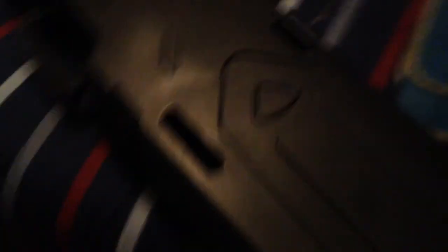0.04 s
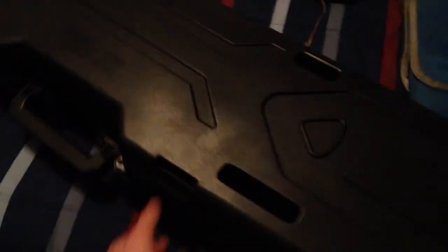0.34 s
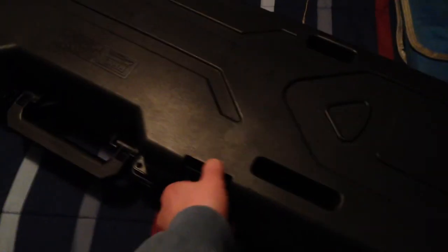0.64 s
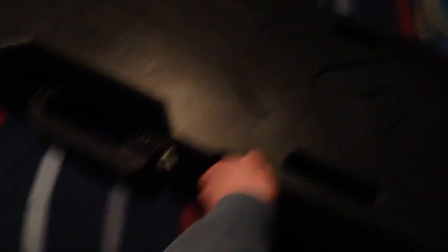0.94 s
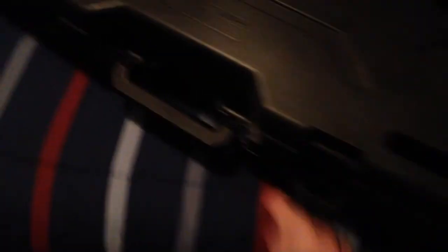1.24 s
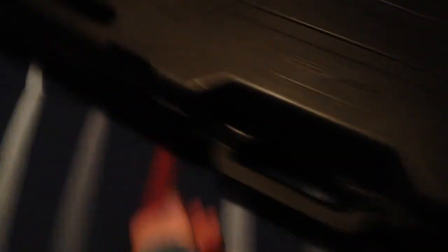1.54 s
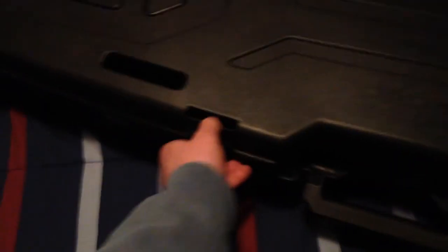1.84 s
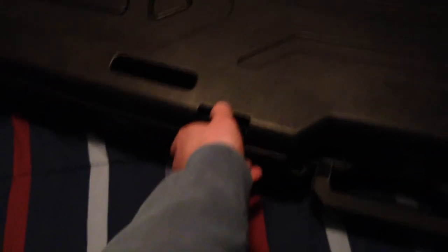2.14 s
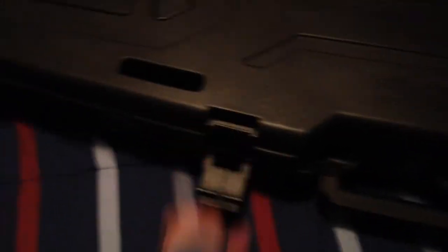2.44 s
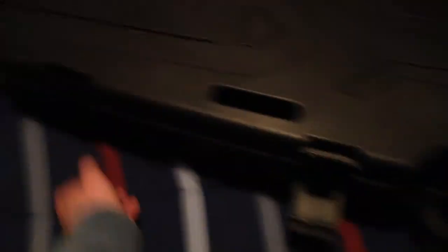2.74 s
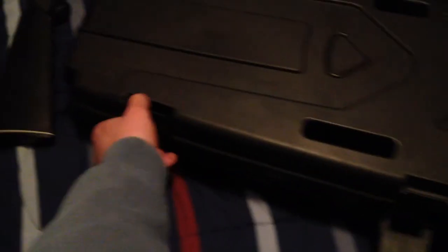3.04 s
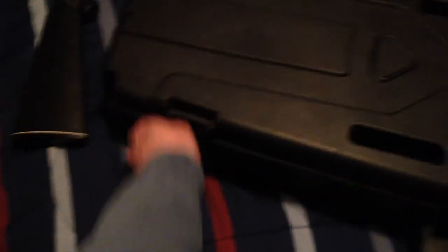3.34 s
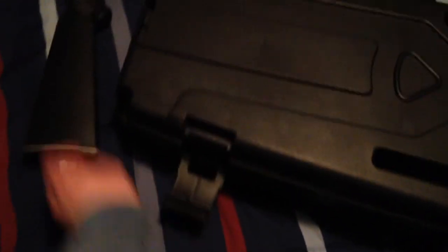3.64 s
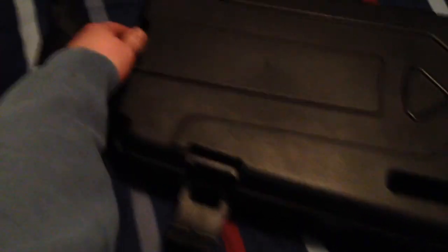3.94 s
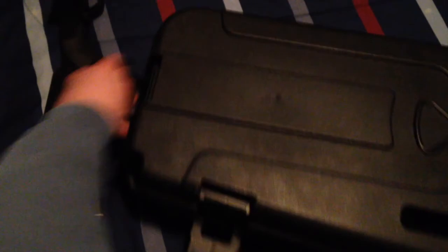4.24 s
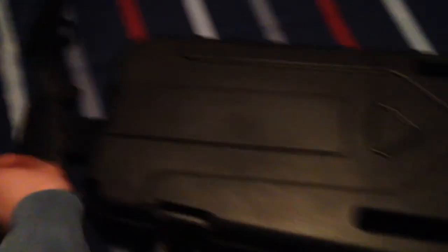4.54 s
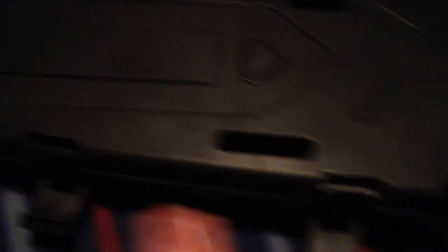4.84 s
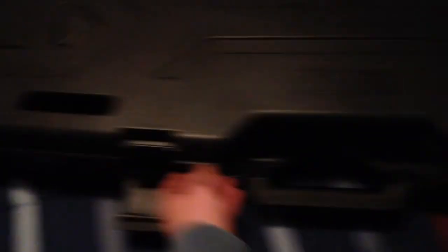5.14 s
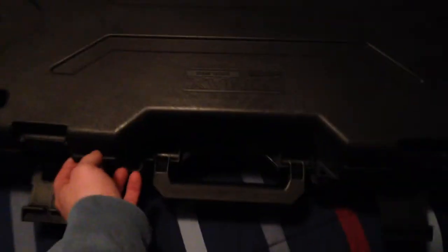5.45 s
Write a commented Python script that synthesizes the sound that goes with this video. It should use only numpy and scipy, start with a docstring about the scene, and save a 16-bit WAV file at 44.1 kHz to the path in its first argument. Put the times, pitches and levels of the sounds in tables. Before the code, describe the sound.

Four latches snap open on a hollow hard plastic case, about a second apart, with light knocks and creaks between them.

```python
"""A long hard plastic case lies on a bed in a small room, under a faint hiss. A hand bumps its shell. Then the
four latches pop, about a second apart: strained levers creak, each lets go with a snap that thumps the hollow
shell and rocks it on the bedding, and the loose hinge parts tick. In between, a sleeve brushes past, and once
the case slides briefly on the bedding. Last, fingers feel for the lid's edge with light taps."""
import sys
import numpy as np
from scipy import signal
from scipy.fft import rfft, irfft, next_fast_len
from scipy.io import wavfile

SR = 44100
rng = np.random.default_rng(int(sys.argv[2]) if len(sys.argv) > 2 else 0)


def unload_wav(signal):
    """Save mono or channel-first audio to the path in sys.argv[1] as 16-bit WAV at rate SR, clipped to [-1, 1]."""
    wavfile.write(
        sys.argv[1],
        SR,
        np.round(np.clip(np.atleast_2d(signal).T, -1, 1) * 32767).astype(np.int16),
    )


N = 247401

# The latches letting go. Each row: start in seconds, thump, knock, crack and tick levels in dB,
# contact decay in seconds, place on the shell from 0 to 1, room send in dB.
SNAPS = [(1.2080, -24.5, -31, -37, -45.5, 0.0013, 0.2, -3.5),
         (2.3337, -30, -34.5, -47, -68, 0.0018, 0.37, -9),
         (3.3541, -24.5, -33.5, -40, -47.5, 0.0014, 0.31, -6.5),
         (4.2544, -35, -41.5, -41, -54, 0.0033, 0.89, -2.5)]
# The registers of a blow: thump, knock, crack and tick. Each row: low and high edge in Hz.
BANDS = [(70, 400), (400, 1500), (1500, 5000), (5000, 15000)]
RING = np.arange(SR // 2) / SR  # seconds since a blow


def latches(panel_wet_db=-14, spring_s=0.0059):
    """Each latch snaps over centre, and the lid panel that it held down springs back and booms."""
    # Latch and panel ringing. Each row: latch 0 to 3, pitch in Hz, level in dB, t60 in seconds.
    panel_modes = [(0, 227.7, -25, 0.27), (0, 297.6, -9, 0.035), (0, 340, -33, .2), (0, 989, -13.5, .022),
                   (0, 1273, -26, 0.015), (0, 2950, -27.5, 0.026), (1, 115, -24.5, 0.15),
                   (1, 314, -18, 0.084), (1, 430, -19.5, 0.054), (1, 686, -30, 0.067),
                   (1, 3400, -37, 0.028), (2, 179.5, -19.5, 0.17), (2, 150, -17.5, 0.038),
                   (2, 296, -23, 0.027), (2, 545, -25.5, .1), (2, 1170, -21, 0.03), (2, 2480, -31, 0.023),
                   (3, 313.3, -26.5, 0.16), (3, 366, -20.5, 0.045), (3, 2160, -33.5, 0.026),
                   (3, 2640, -57, .04)]
    out = np.zeros(N)
    for index, (s, *levels_db, contact_s, place, wet_db) in enumerate(SNAPS):
        out += blow(s, levels_db, contact_s, place, wet_db)
        panel = sum(undb(db) * np.sin(2 * np.pi * hz * RING) * fade(t60)
                    for latch, hz, db, t60 in panel_modes if round(latch) == index)
        boom = band(panel * (1 - fade(spring_s)), (60, 9000), order=2)
        add(out, s, bedroom(boom, panel_wet_db, t60=0.21))
    return out


def blow(s, levels_db, contact_s, place, wet_db, grain_db=3.5, chatter_db=-22, chatter_t60=0.089,
         build_s=0.005, echo_db=-4, wash_db=-2):
    """A burst of tiny slips scuffs and rings the case; levels are set over each register's first 30 ms."""
    # The colour of plastic scuffing on plastic. Each row: frequency in Hz, relative level in dB.
    scuff_colour = [(60, -11), (150, 1.5), (330, 10), (500, 0.5), (1150, -9), (1600, -19.5), (2800, -24),
                    (4500, -23.5), (6000, -31.5), (9000, -26), (12000, -39), (15000, -45.5)]
    # The walls' return, dulled by the bedding. Each row: frequency in Hz, relative level in dB.
    wash_colour = [(60, -14.5), (130, -1.5), (330, -2), (500, 0.5), (1150, -17), (1600, -18), (2900, -20),
                   (4000, -27.5), (5000, -29), (7000, -31.5), (9000, -34), (15000, -49)]
    # The mix of each register, thump to tick. Each row: scuff against ring in dB, room send offset in dB,
    # room t60 in seconds, head start in seconds.
    register_mix = [(-7.5, -5, .28, 0.0016), (2, 1.5, 0.28, 0.001477), (7, 2, 0.26, 0.00094),
                    (8.5, -2.5, 0.21, 0.00096)]
    out = np.zeros(N)
    press = 1 - np.exp(-RING / (0.42 * contact_s))  # soft contacts build up slowly
    ring = shell(place) * press
    slips = np.repeat(rng.standard_normal(len(RING)), SR // 1500)[:len(RING)]  # about 1500 a second
    # the lid chatters on its rim after the contact itself
    dying = np.exp(-RING / contact_s) + undb(chatter_db) * fade(chatter_t60)
    scuff = noise(scuff_colour, len(RING)) * undb(grain_db * slips) * press * dying
    # the walls hear every side of the case at once, so an even wash lies under the echoes
    wash = noise(wash_colour, len(RING)) * (1 - np.exp(-(RING / build_s) ** 2))
    for edges, db, (scuff_db, room_db, t60, lead_s) in zip(BANDS, levels_db, register_mix):
        direct = unit(unit(band(ring, edges)) + undb(scuff_db) * unit(band(scuff, edges)))
        heard = bedroom(direct, wet_db + room_db + echo_db, t60)
        heard += undb(wet_db + room_db + wash_db) * unit(band(wash * fade(t60), edges))
        add(out, s - lead_s, undb(db) * heard / np.std(heard[RING < .03]))
    return out


def shell(place, depth_db=4):
    """The hollow case rings; bending waves make each mode strong or weak at the struck place."""
    # The modes of the case and its levers. Each row: pitch in Hz, relative level in dB, t60 in seconds.
    case_modes = [(116.4, -10.5, 0.096), (147.6, 1.5, 0.093), (173.5, -4, 0.14), (213, -8, 0.11),
                  (268.5, 6, 0.032), (318.4, -5.5, 0.11), (363, -0.5, 0.04), (433.8, -7.5, 0.17),
                  (557, -8.5, 0.074), (629, -11.5, 0.099), (686, -8.5, 0.066), (760, -18.5, .08),
                  (968, -15, 0.085), (1101, -9.5, 0.036), (1170, -15.5, 0.05), (1296, -22.5, 0.05),
                  (1624, -15, 0.023), (2020, -20, 0.047), (2333, -15.5, 0.067), (2540, -13, 0.02),
                  (2950, -18, 0.016), (3266, -14.5, 0.074), (3400, -13.5, .05), (3903, -11.5, 0.028),
                  (4405, -17, 0.025)]
    ring = np.zeros(len(RING))
    for hz, db, t60 in case_modes:
        place_db = depth_db * np.cos(np.pi * place * np.sqrt(hz / 15))
        ring += undb(db + place_db) * np.cos(2 * np.pi * hz * RING) * fade(t60)
    return ring


def handling(gain_db=-1, wet_db=-6, yield_ahead_s=.0105, yield_db=-19.5):
    """Fingers and loose levers knock on the case, and each lever yields with a thud before its snap."""
    # Grips, bumps and levers falling back. Each row: start in seconds, relative thump level in dB,
    # tilt in dB per octave, contact decay in seconds.
    touches = [(0.034, -51, -3, 0.0083), (.054, -48, -8.5, 0.0043), (.069, -38.5, -7, 0.0028),
               (.094, -57, -22, 0.0023), (.557, -63, -4, 0.0095), (.646, -63, -3, .0017),
               (.703, -58.5, -4, 0.0013), (0.773, -58.5, -8, 0.0048), (.95, -57, -7, 0.0091),
               (.998, -58.5, -4.5, 0.0036), (1.123, -64, -4, .0021), (1.274, -36.5, -4.5, 0.0038),
               (1.296, -51, -5.3, 0.0025), (1.77, -47, -3, 0.005), (2.0, -54.5, -2.4, 0.0034),
               (2.497, -57, -3.5, 0.0056), (3.043, -48.5, -5.5, 0.0043), (3.07, -44, -5.5, 0.0034),
               (3.087, -51, -5, 0.0057), (3.48, -50.5, -3, 0.0039), (3.537, -62, -3, 0.0022),
               (3.886, -48, -6.5, 0.013), (3.991, -52, -6, 0.0045), (4.368, -56.5, -3.5, 0.0032),
               (4.39, -48.5, -4.5, 0.003), (4.466, -53.5, -4, 0.008), (5.036, -69, -7.5, .005),
               (5.189, -51.5, -3, .0015), (5.234, -53, -3, 0.0079), (5.272, -58, -5.5, 0.002),
               (5.4, -63.5, -4, 0.0081), (5.498, -57, -5, 0.0043)]
    knocks = sum(tap(s, db, tilt_db, contact_s, wet_db) for s, db, tilt_db, contact_s in touches)
    thuds = sum(tap(s - yield_ahead_s, thump_db + yield_db, tilt_db=-6, contact_s=.007, wet_db=wet_db)
                for s, thump_db, *_ in SNAPS)
    return undb(gain_db) * (knocks + thuds)


def tap(s, db, tilt_db, contact_s, wet_db):
    """A light blow that falls off by tilt_db per octave above the thump: soft fingers sound duller."""
    centres = np.sqrt(np.prod(BANDS, axis=1))
    octaves = np.log2(centres / centres[0])
    return blow(s, db + tilt_db * octaves, contact_s, place=.45, wet_db=wet_db)


def creaks_and_rim_knocks(spread=1.126, slip_hz=600, slip_t60=0.0084, wet_db=-9):
    """Plastic sticks and slips, ringing the bright lever and the lower rim; short rim bursts knock."""
    # Lever creaks, plus two short knocks on the lid's rim. Each row: start in seconds, lever peak in dB,
    # lever pitch in Hz, rim level in dB, length in seconds.
    slip_bursts = [(0.063, -72, 3400, -43.5, .004), (0.557, -52, 3190, -66, 0.014),
                   (1.768, -42.5, 3400, -54, 0.02), (1.996, -46, 3400, -55.5, 0.0054),
                   (2.595, -60.5, 3150, -74, 0.022), (3.069, -41, 3400, -43, 0.022),
                   (3.989, -47.5, 2900, -51.5, .012), (4.26, -32.5, 2600, -63, 0.035),
                   (4.466, -50, 1820, -54, 0.0035), (5.189, -44.5, 4050, -63, .0034),
                   (5.228, -64, 3400, -45, 0.0094)]
    # The rim's resonances. Each row: pitch in Hz, offset from the rim level in dB.
    rim_modes = [(595, 0.5), (1170, -1.5)]
    out = np.zeros(N)
    for s, lever_db, lever_hz, rim_db, length in slip_bursts:
        slipping = (rng.random(len(RING)) < slip_hz / SR) * (RING < length)
        slips = slipping * rng.uniform(0.34, 1, len(RING))
        slips[0] = 1  # every burst opens with a full slip
        scrape = signal.fftconvolve(slips, fade(slip_t60))[:len(RING)] * rng.standard_normal(len(RING))
        rim = [(hz, rim_db + offset_db) for hz, offset_db in rim_modes]
        for hz, db in [(lever_hz, lever_db)] + rim:
            ring = band(scrape, (hz / spread, hz * spread), order=2)
            add(out, s, bedroom(undb(db) * ring / np.abs(ring).max(), wet_db, t60=0.2))
    return out


def hinge_ticks(spread=1.22, rasp_db=-10, wet_db=-12):
    """Small hinge parts tick or scrape with one short, high resonance."""
    # Loose pins and links. Each row: start in seconds, peak in dB, pitch in Hz, t60 in seconds.
    clinks = [(0.022, -53, 4430, 0.0051), (1.213, -25, 8100, 0.0043), (1.277, -31.5, 6070, .0073),
              (1.972, -59, 3640, .027), (2.472, -52, 5370, 0.022), (2.493, -51, 8770, 0.012),
              (3.205, -60.5, 6000, 0.17), (3.479, -52.5, 5900, .033), (3.494, -43.5, 6600, 0.023),
              (3.533, -55, 7000, 0.055), (3.701, -58.5, 5040, 0.11), (4.071, -57, 4990, .1),
              (4.466, -47.5, 6500, 0.062)]
    out = np.zeros(N)
    for s, db, hz, t60 in clinks:
        contact = rng.standard_normal(len(RING)) * fade(t60)
        ping = unit(band(contact, (hz / spread, hz * spread), order=2))
        rasp = unit(band(contact, (2000, 10000), order=2))
        tick = ping + undb(rasp_db) * rasp
        add(out, s, bedroom(undb(db) * tick / np.abs(tick).max(), wet_db, t60=0.27))
    return out


def cloth_strokes():
    """Cloth rubs the case in a few short strokes: the sleeve brushes past, and once the case slides on the
    bedding."""
    # Cloth passing along the case. Each row: start in seconds, length in seconds, relative level in dB.
    strokes = [(0.026, 0.051, -76), (1.506, 0.043, -71.5), (2.41, 0.19, -77), (3.88, 0.045, -76.5),
               (4.367, 0.072, -66)]
    # The colour of the cloth. Each row: frequency in Hz, relative level in dB.
    cloth_colour = [(300, 11.5), (1000, -2.5), (2500, -2), (5000, -3), (8000, -3.5), (12000, -5.5),
                    (15500, -7)]
    motion = sum(undb(db) * swell(s, length, attack=.015, t60=0.38) for s, length, db in strokes)
    return undb(5) * rubbing(motion, cloth_colour, flutter_db=2.5, flutter_hz=520)


def bedding(rock_db=-30, settle_t60=0.44):
    """The case slides a little under the hand, and rocks and settles after every snap."""
    # The level curve of the case sliding on the bed. Each row: time in seconds, level in dB.
    slide_curve = [(0.0, -66), (0.31, -72.5), (0.56, -74), (0.67, -68), (1.01, -72.5), (1.17, -64),
                   (1.67, -70), (2.34, -65), (2.79, -76.5), (3.04, -74.5), (3.26, -68.5), (3.76, -72.5),
                   (4.43, -66.5), (4.52, -72.5), (4.98, -68.5), (5.6, -64)]
    # The colour of that low rub. Each row: frequency in Hz, relative level in dB.
    rub_colour = [(25, -7), (60, 3), (150, -2.5), (330, -2), (600, -8), (1200, -13.5), (3000, -19),
                  (6000, -29), (15000, -38)]
    sliding = undb(np.interp(np.arange(N) / SR, *np.transpose(slide_curve)))
    rocking = sum(undb(thump_db + rock_db) * swell(s, 0, attack=.01, t60=settle_t60)
                  for s, thump_db, *_ in SNAPS)
    return rubbing(sliding + rocking, rub_colour, flutter_db=1, flutter_hz=63)


def rubbing(motion, colour, flutter_db, flutter_hz):
    """Fabric catching and sliding: noise that swells with the motion and flutters with the weave."""
    return noise(colour, N) * motion * undb(flutter_db * walk(flutter_hz))


def bedroom(x, wet_db, t60, gap=.004):
    """Direct sound plus dense reflections that set in after a short gap."""
    echoes = rng.standard_normal(len(RING)) * fade(t60) * np.clip(RING / gap - 1, 0, 1)
    return x + undb(wet_db) * signal.fftconvolve(x, echoes / np.linalg.norm(echoes))[:len(x)]


def steady_hiss(level_db=-73.5):
    """A faint steady hiss, weighted to the low end, lies under everything."""
    # The colour of the hiss. Each row: frequency in Hz, relative level in dB.
    hiss_colour = [(25, -7.5), (70, -3.5), (130, -3.5), (330, -12.5), (600, -14.5), (1200, -19.5),
                   (2500, -18), (5000, -21.5), (10000, -25), (15500, -28)]
    return undb(level_db) * noise(hiss_colour, N)


def undb(db):
    """Decibels to gain."""
    return 10 ** (np.asarray(db) / 20)


def unit(x):
    """Scale to rms 1."""
    return x / np.sqrt(np.mean(x ** 2))


def fade(t60):
    """Free decay, 60 dB down after t60 seconds."""
    return np.exp(-np.log(1000) * RING / t60)


def swell(start, length, attack, t60):
    """Rise, hold for the length of a motion, then die away."""
    t = np.arange(N) / SR - start
    return np.clip(t / attack, 0, 1) * undb(-60 * np.maximum(t - length, 0) / t60)


def band(x, edges, order=3):
    """Causal band-pass."""
    return signal.sosfilt(signal.butter(order, edges, "bandpass", fs=SR, output="sos"), x + 1e-18)


def noise(points, size):
    """Noise of rms 1 with a spectrum of (Hz, dB) points."""
    hz, db = np.transpose(points)
    n = next_fast_len(size)
    f = np.maximum(np.fft.rfftfreq(n, 1 / SR), 1)
    gains = undb(np.interp(np.log(f), np.log(hz), db))
    return unit(irfft(rfft(rng.standard_normal(n)) * gains, n)[:size])


def walk(rate):
    """Smooth random wander with a spread near 1."""
    knots = rng.standard_normal(4096)
    return np.interp(np.arange(N) / SR * rate, np.arange(len(knots)), knots)


def add(out, s, sound):
    """Mix a sound in at time s."""
    i = max(int(s * SR), 0)
    out[i:i + len(sound)] += sound[:N - i]


def scene():
    """Latches, hand and cloth over a faint hiss, in mono."""
    case = latches() + handling() + creaks_and_rim_knocks() + hinge_ticks()
    return (case + cloth_strokes() + bedding() + steady_hiss())[None]


def record(dry, top_hz=15450):
    """A steep low-pass takes off the highest treble."""
    return signal.sosfilt(signal.ellip(10, .2, 70, top_hz, fs=SR, output="sos"), dry)


dry = scene()
out = record(dry)
unload_wav(out)
```